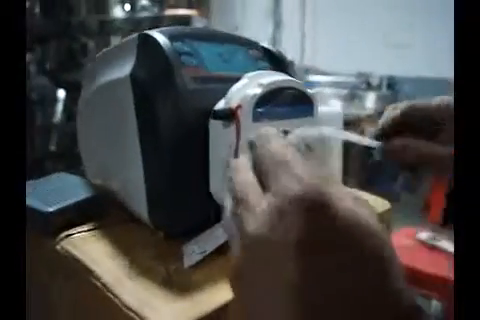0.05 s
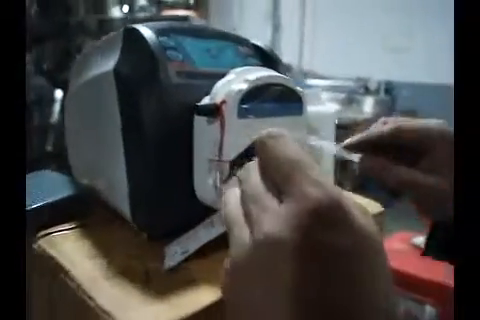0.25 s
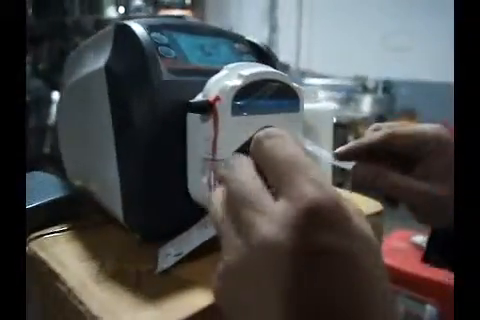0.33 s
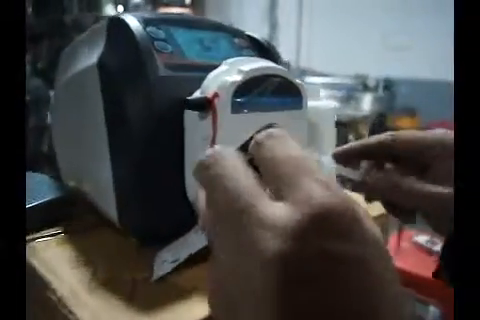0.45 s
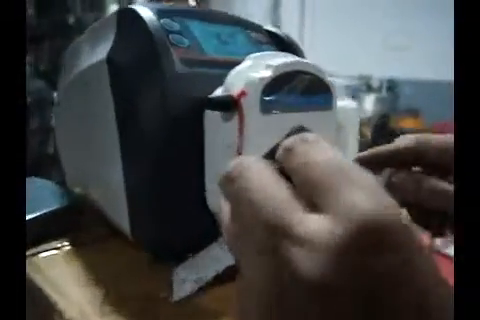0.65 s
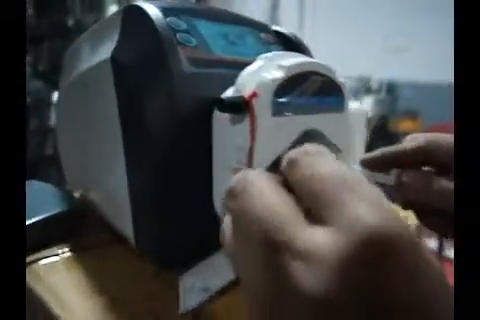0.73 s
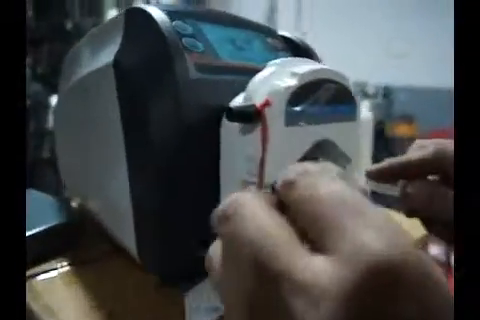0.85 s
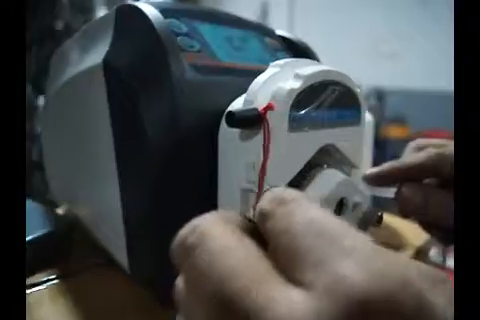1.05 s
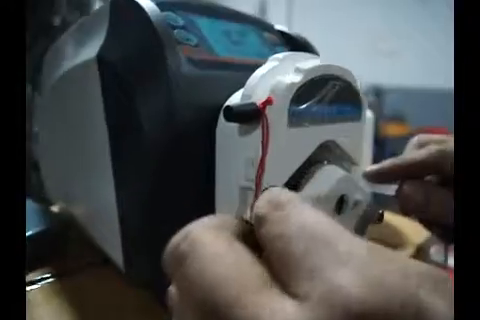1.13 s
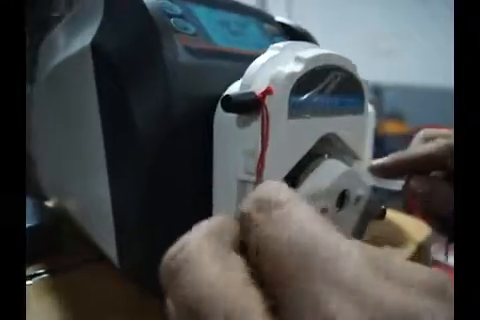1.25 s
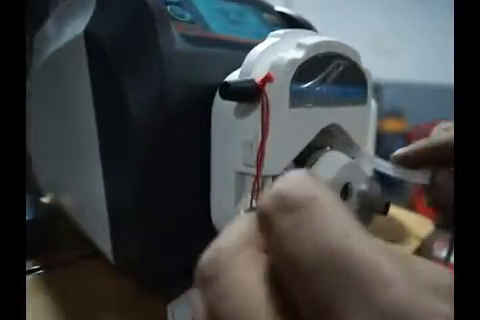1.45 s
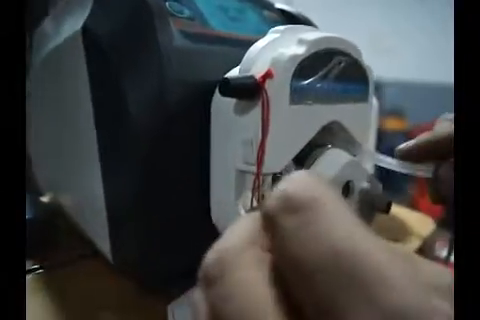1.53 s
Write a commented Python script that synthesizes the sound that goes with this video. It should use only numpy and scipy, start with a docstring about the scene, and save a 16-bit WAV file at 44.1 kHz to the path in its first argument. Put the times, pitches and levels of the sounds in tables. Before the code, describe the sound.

Plastic knocks on a pump in an echoing workshop: light taps, a hollow thump and a soft slide of tubing. Then a catch snaps shut near the microphone, slightly to the right, with a faint steady room hum underneath.

```python
"""A benchtop pump's plastic head knocks as hands fit tubing into it, in an echoing workshop.
A part taps, slides and lands with a hollow double thump that rings the housing and the room.
The tubing rubs with a faint hiss, and a catch clicks shut close by on the right.
Underneath are soft bumps from the hands, a fading ring in the room and a low, steady hum."""
import sys
import numpy as np
from scipy import signal
from scipy.fft import rfft, irfft, next_fast_len
from scipy.io import wavfile
from scipy.ndimage import map_coordinates

SR = 44100
rng = np.random.default_rng(int(sys.argv[2]) if len(sys.argv) > 2 else 0)


def digitize_waveform(pressure):
    """Quantize a signal to 16-bit integers and store it at the path in sys.argv[1].

    Rows of a 2-D input are taken as channels; values are limited to [-1, 1].
    """
    field = np.atleast_2d(pressure).T
    bounded = np.clip(field, -1, 1)
    quanta = np.round(bounded * 32767).astype(np.int16)
    wavfile.write(sys.argv[1], SR, quanta)


N = 70560

# how alike the two ears hear the room: f/Hz, likeness (1 = the same)
EAR_LIKENESS = [(100, 0.96), (400, 0.76), (800, 0.62), (1300, 0.41), (2000, -0.22), (3000, 0.062),
                (4500, -0.021), (8000, 0.053)]
# how long the echo lasts: f/Hz, t60/s (the time to fade by 60 dB)
ECHO_TIMES = [(100, 0.88), (350, 1.17), (800, 1.52), (2000, 1.62), (4500, 1.4), (12000, 0.99)]
# tone of the echo: f/Hz, level/dB
ECHO_TONE = [(60, -15), (130, 5.5), (200, -4), (330, -2.5), (460, -2.5), (600, -2), (800, 1.5), (1100, 0),
             (1600, 2.5), (4000, -1), (12000, 7)]
# tone of the room's hum: f/Hz, level/dB
HUM_TONE = [(20, 7), (45, -15), (75, -0.5), (120, -4), (200, -2), (400, 2.5), (900, 0), (2000, -12.5),
            (4000, -12.5), (8000, -12.5), (13000, -13)]
# tone of the room's fading ring: f/Hz, level/dB
RING_TONE = [(100, -15.5), (400, -3.5), (900, -3.5), (1600, -11.5), (3000, -19), (12000, -46)]
# sliding strokes: peak t/s, rise/s, release/s, level/dB, centre f/Hz, width/octaves
STROKES = [(0.0058, 0.15, .7, -55, 5100, 1.75), (0.2668, 0.069, 0.17, -37, 4080, 1.0),
           (0.25, 0.12, 0.23, -44, 7500, 1.5), (0.261, 0.08, .1, -44, 2740, 0.39),
           (0.23, .05, 0.27, -49, 1580, 0.45), (0.384, 0.07, 0.065, -41, 1830, 2.04),
           (0.398, 0.076, 0.21, -47.5, 4100, 0.4), (0.55, 0.026, 0.37, -53, 2940, 1.85),
           (1.035, .06, 0.046, -66.5, 2900, 0.25), (1.385, 0.09, 0.076, -72, 2600, 1.4)]
# dull knocks: t/s, level/dB, f/Hz, half length/s, echo level/dB
CONTACTS = [(0.175, -33.5, 880, 0.00096, -2), (0.1799, -36, 845, 0.0012, -36),
            (0.2312, -30.5, 970, 0.00045, -21), (0.2338, -24.5, 885, 0.00063, 7),
            (0.2388, -25.5, 466, 0.0012, 0), (0.2726, -12.5, 500, 0.0012, -4.5),
            (.2753, -8.5, 465, 0.00086, -2), (0.374, -30, 340, 0.0023, -9.5),
            (.5958, -33, 914, 0.00035, -16), (0.6001, -39.5, 910, 0.0015, -14),
            (.9568, -50.5, 1950, 0.0012, -13), (0.9596, -48.5, 970, 0.0018, -27)]
# notes the pump's housing rings at: f/Hz, level/dB, t60/s
HOUSING_NOTES = [(445, -12.5, 0.017), (804, -18, 0.013), (1058, -28, 0.066)]
# soft bumps of the hands: t/s, level/dB
HAND_BUMPS = [(.175, -57), (.272, -50.5), (.54, -60.5), (.6, -65.5), (.75, -56), (.95, -65)]
# tone of tubing slipping through its guide: f/Hz, level/dB
TUBING_TONE = [(1000, -11), (3200, -12), (3700, 1.5), (4100, -8), (4500, -8), (4850, -5), (5500, -22),
               (12000, -22)]
# the catch snaps and settles: t/s, level/dB
SNAPS = [(0.7467, -17), (0.7475, -27.5), (0.7478, -35)]
# notes the catch rings at: f/Hz, level/dB, t60/s, left minus right/dB
CATCH_NOTES = [(477, -23, 0.062, -6), (885, -7, 0.018, 1.5), (1400, -20.5, 0.021, 5),
               (2020, -7, 0.018, -1.5), (2510, -12, 0.047, -6), (3090, -7.5, 0.012, -15),
               (3800, -11.5, 0.011, -2.5), (5200, -6, 0.003, -16.5), (5650, -10.5, 0.0063, -17),
               (6140, -16, 0.0072, -12), (7570, -5.5, 0.0026, -16), (8300, -12.5, 0.0025, -15),
               (10500, -23.5, 0.0066, -3)]
# tone of the microphone: f/Hz, level/dB
MIC_TONE = [(30, -4.5), (120, -15), (200, -4.5), (400, 0.5), (500, -2.5), (600, -11), (730, -0.5),
            (1100, 0.5), (1400, -8.5), (1750, 3.5), (2120, 4), (2400, -8), (2700, 3.5), (3050, 3),
            (3450, -6), (4000, 3), (5200, -1), (8000, -7), (13500, -15)]

RUB_SWELL_DB = 35.5  # a rub grows this much in one rise time and drops as much in one release time
TIME = np.arange(N) / SR


def amp(db):
    """Turn decibels into a number to multiply by."""
    return 10 ** (np.asarray(db) / 20)


def unit(x):
    """Scale a sound to an average strength (rms) of 1."""
    return x / np.sqrt(np.mean(x ** 2) + 1e-20)


def along(points, hz):
    """Read between a table's rows on a log frequency scale."""
    f, v = np.transpose(points)
    return np.interp(np.log(hz + 1), np.log(f + 1), v)


def filtered(x, response):
    """Multiply each frequency in x by response(hz)."""
    size = 2 * next_fast_len(N)
    hz = np.fft.rfftfreq(size, 1 / SR)
    return irfft(rfft(x, size) * response(hz), size)[..., :N]


def lowpass(x, top_hz, order):
    """Smoothly turn down everything above top_hz."""
    return filtered(x, lambda hz: 1 / np.sqrt(1 + (hz / top_hz) ** (2 * order)))


def causal(gain):
    """A filter with this gain that never rings ahead of the sound (minimum phase)."""
    cepstrum = irfft(np.log(gain))
    half = len(cepstrum) // 2
    return np.exp(rfft(np.r_[cepstrum[0], 2 * cepstrum[1:half], np.zeros(half)]))


def panned(db):
    """Two gains that make the left side db louder than the right."""
    return amp(np.array([[db], [-db]]) / 2)


def dying(t, t60):
    """Start at t = 0 and fade by 60 dB every t60 seconds."""
    return (t >= 0) * np.exp(-np.log(1000) * np.abs(t) / t60)


def wide_noise():
    """White noise from all around: alike at both ears in the bass, unrelated in the treble."""
    angle = lambda hz: np.arccos(np.clip(along(EAR_LIKENESS, hz), -1, 1)) / 2
    shares = lambda hz: np.array([np.cos(angle(hz)), np.sin(angle(hz))])
    mid, side = filtered(rng.standard_normal((2, N)), shares)
    return unit(np.array([mid + side, mid - side]))


def shaped_noise(tone):
    """Noise from all around, shaped by a tone table."""
    return unit(filtered(wide_noise(), lambda hz: amp(along(tone, hz))))


def room_hum():
    """The workshop's air makes a steady, low noise."""
    return amp(-56) * shaped_noise(HUM_TONE)


def room_ring():
    """The room is still ringing faintly at the start."""
    return amp(-53) * dying(TIME, t60=3.3) * shaped_noise(RING_TONE)


def echo(x):
    """The workshop throws a sound back; each frequency fades at its own speed."""
    hz, t, spectrum = signal.stft(wide_noise(), SR, nperseg=256)
    fade = amp(-60 * t / along(ECHO_TIMES, hz)[:, None])
    tail = signal.istft(spectrum * fade, SR, nperseg=256)[1][:, :N]
    tail = filtered(tail / np.linalg.norm(tail[0]), lambda f: amp(along(ECHO_TONE, f)))
    return signal.fftconvolve(np.atleast_2d(x), tail, axes=1)[:, :N]


def slides():
    """Tubing and plastic stick and slip as they rub: a grainy hiss that swells and fades."""
    grain_db, grain_hz = 2.5, 510.6  # how much and how fast the level flickers
    out = np.zeros((2, N))
    for peak, rise, release, db, centre_hz, width in STROKES:
        t = TIME - peak
        band = lambda hz: np.exp(-np.hypot(1, np.log2((hz + 1) / centre_hz) / width * 2))
        hiss = filtered(wide_noise(), band)
        grain = map_coordinates(rng.standard_normal(N // 10), [TIME * grain_hz], order=1)
        swell = amp(db - RUB_SWELL_DB * np.maximum(-t / rise, t / release))
        out += unit(hiss * amp(grain_db * grain)) * swell
    return out * panned(1.5) + amp(-4.5) * echo(out[0])


def knocks():
    """Each knock is one short push that rings the housing, then the room."""
    out = np.zeros((2, N))
    for when, db, hz, half_length, echo_db in CONTACTS:
        t = TIME - when
        push = -np.cos(2 * np.pi * hz * t) * np.exp(-(t / half_length) ** 2)
        rebound = np.exp(-(t / half_length / 2) ** 2)
        push -= rebound * push.sum() / rebound.sum()  # the plastic wall springs back
        ring = sum(amp(level) * dying(t, t60) * np.sin(2 * np.pi * f * t)
                   for f, level, t60 in HOUSING_NOTES)
        knock = amp(db) * (push + ring)
        out += knock + amp(echo_db) * echo(knock)
    return out


def hand_bumps():
    """Hands shift against the pump with a faint, low rumble."""
    half_length_s = 0.043
    rumble = unit(lowpass(wide_noise(), top_hz=131, order=3))
    return rumble * sum(amp(db) * np.exp(-((TIME - when) / half_length_s) ** 2)
                        for when, db in HAND_BUMPS)


def tubing_pull():
    """Tubing slips through its guide with a thin, even hiss that stops when the hand does."""
    start_s, stop_s, rise_s, release_s = 0.68, 0.954, 0.34, 0.037
    fade = np.maximum((start_s - TIME) / rise_s, (TIME - stop_s) / release_s)
    return amp(-58.5 - RUB_SWELL_DB * np.maximum(fade, 0)) * shaped_noise(TUBING_TONE)


def catch():
    """A small, hard plastic catch snaps close by, with a crack, a short ring and little echo."""
    delay_s = np.array([[0.00018], [0]])  # the sound reaches the left side later
    build_cycles = 0.96  # each note takes about one cycle to build, so low ones come last
    out = np.zeros((2, N))
    for when, db in SNAPS:
        t = np.maximum(TIME - when - delay_s, 0)
        ring = np.zeros((2, N))
        for hz, level, t60, pan_db in CATCH_NOTES:
            build = 1 - np.exp(-hz * t / build_cycles)
            ring += amp(level) * panned(pan_db) * build * dying(t, t60) * np.sin(2 * np.pi * hz * t)
        burst = (t > 0) * dying(t, t60=0.013) * rng.standard_normal((2, N))
        crack = amp(-13.5) * panned(-3.5) * lowpass(burst, top_hz=7500, order=4)
        out += amp(db) * (crack - ring)
    return out + amp(-24.5) * echo(out[1])


def scene():
    """Add the sounds of the hands' work to those of the room."""
    return room_hum() + room_ring() + slides() + knocks() + hand_bumps() + tubing_pull() + catch()


def record(dry):
    """The microphone colours the sound and keeps nothing above 14000 Hz."""
    coloured = filtered(dry, lambda hz: causal(amp(along(MIC_TONE, hz))))
    return filtered(coloured, lambda hz: hz < 14000)


dry = scene()
out = record(dry)
digitize_waveform(out)
```